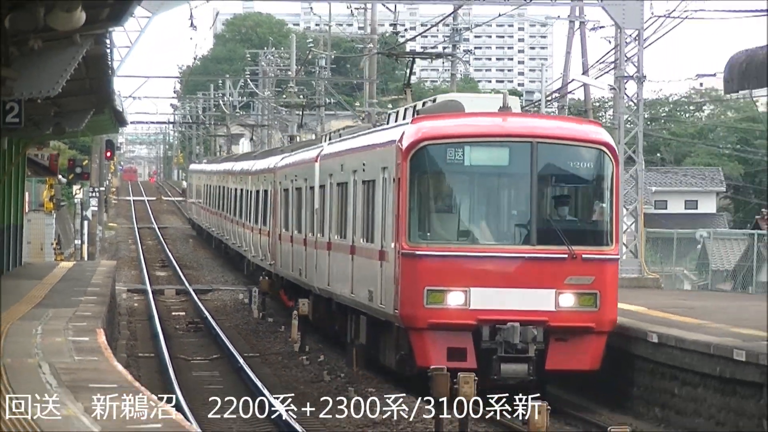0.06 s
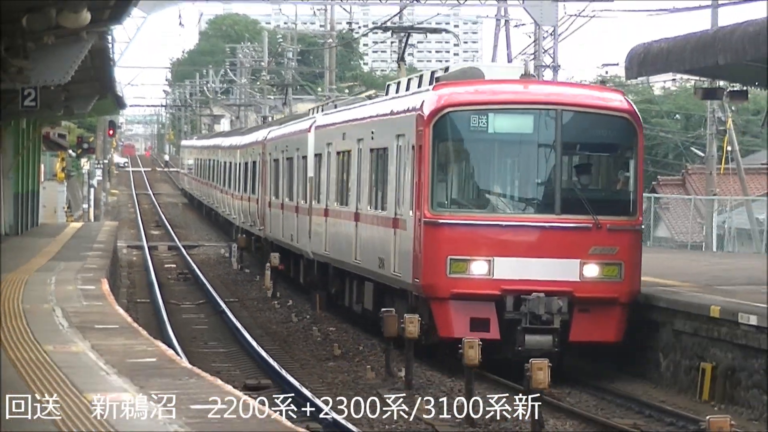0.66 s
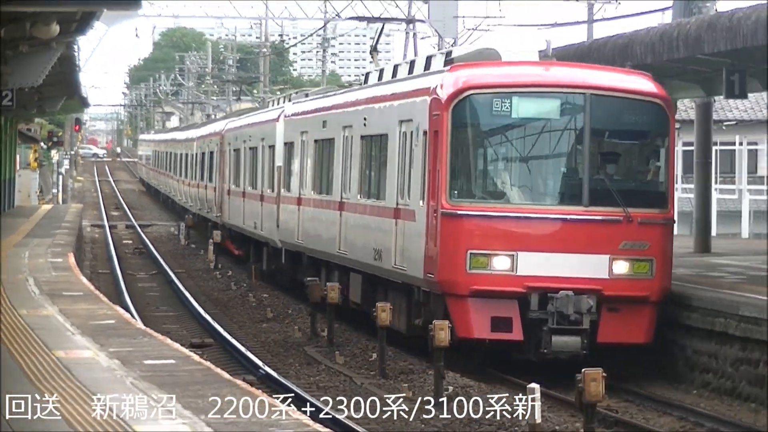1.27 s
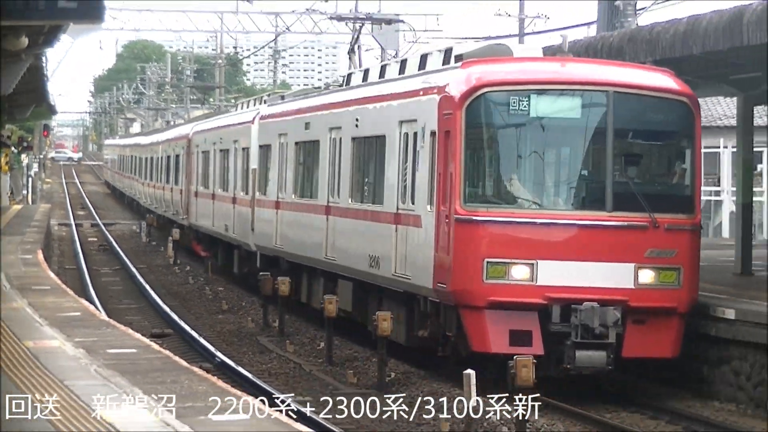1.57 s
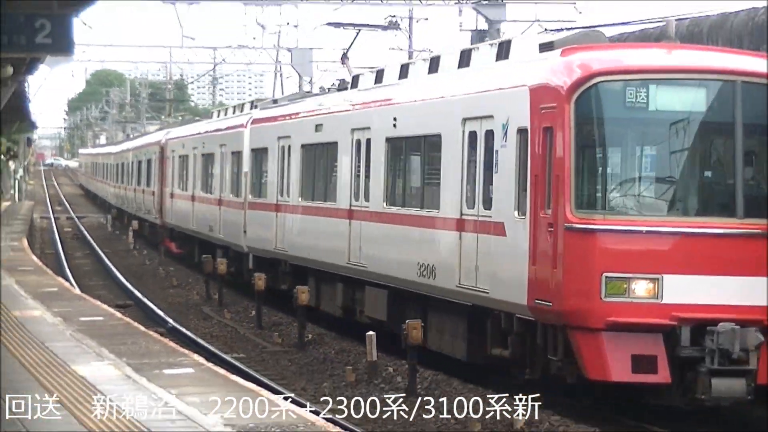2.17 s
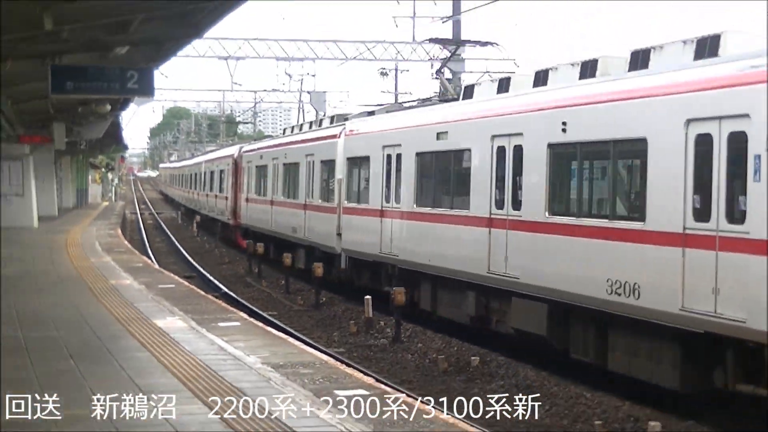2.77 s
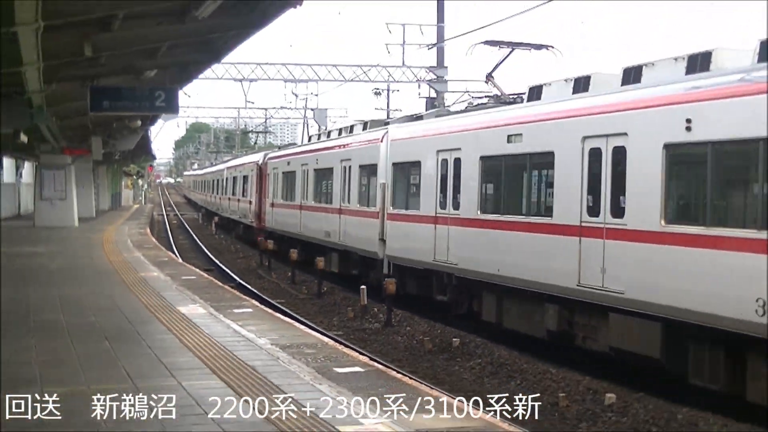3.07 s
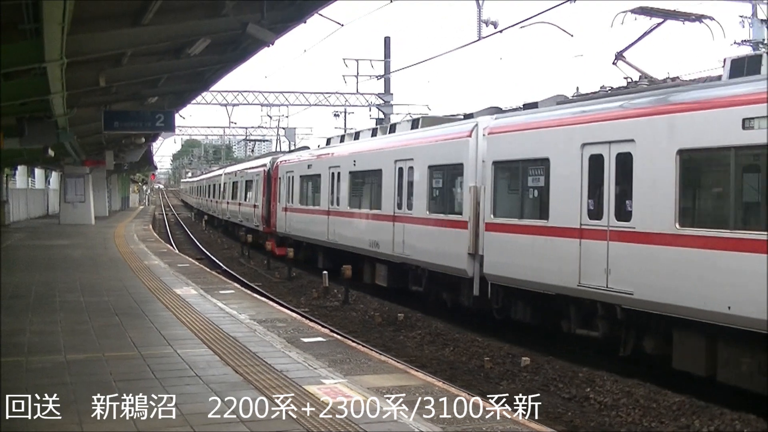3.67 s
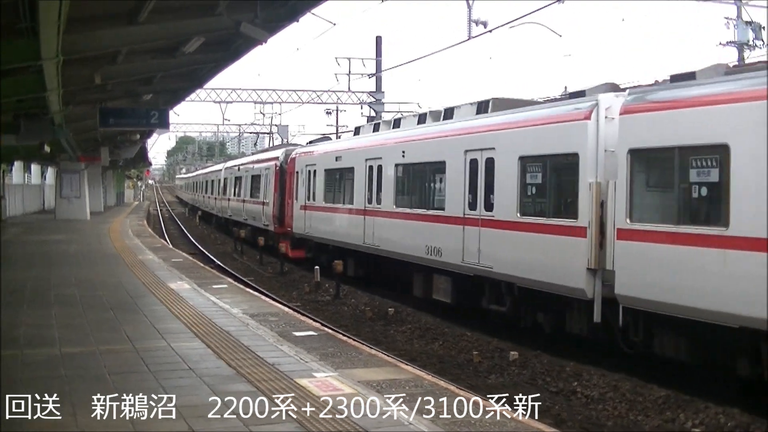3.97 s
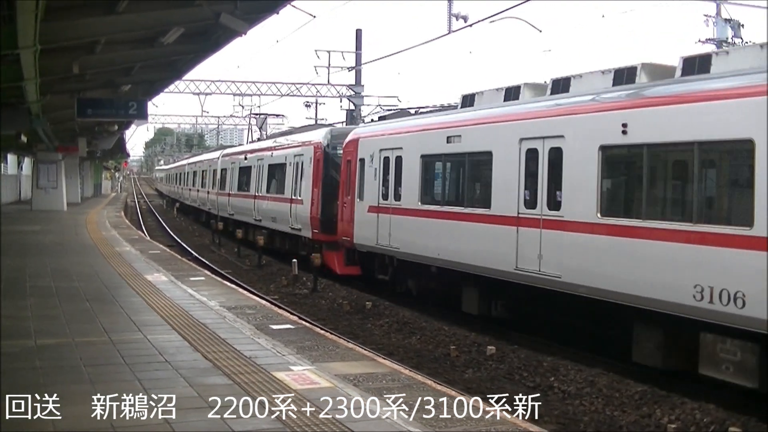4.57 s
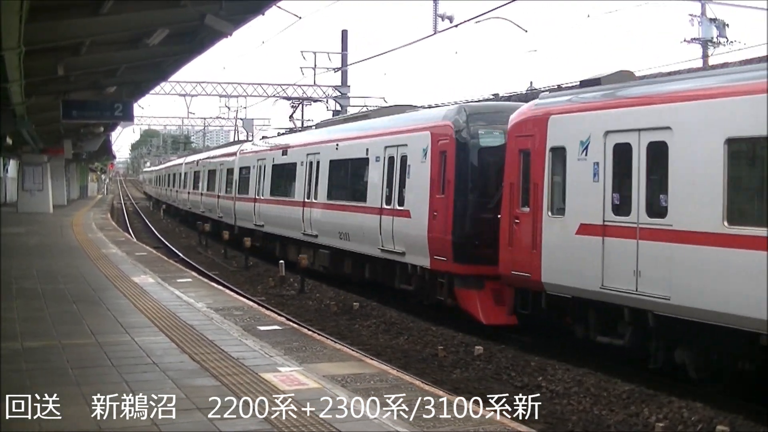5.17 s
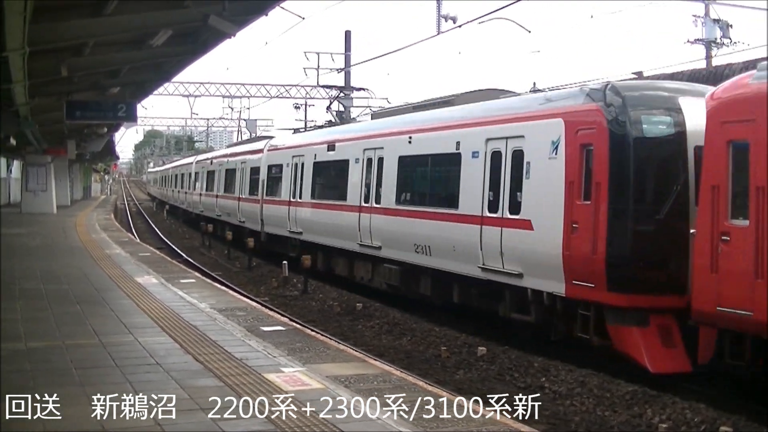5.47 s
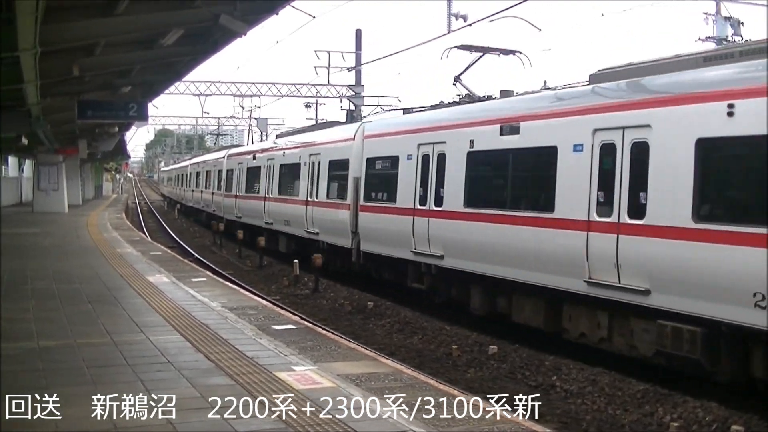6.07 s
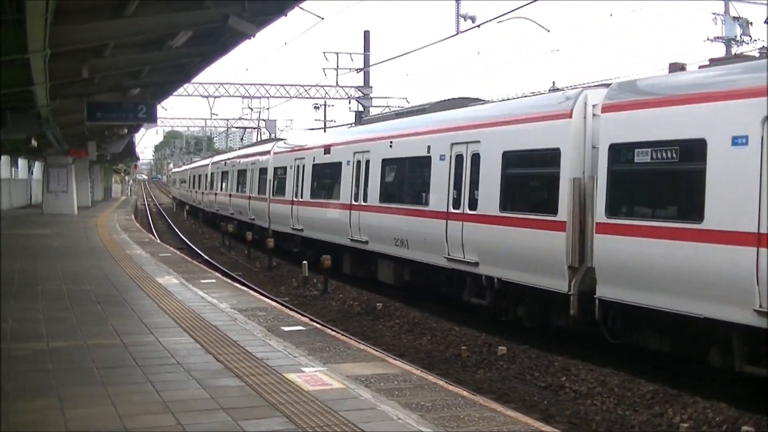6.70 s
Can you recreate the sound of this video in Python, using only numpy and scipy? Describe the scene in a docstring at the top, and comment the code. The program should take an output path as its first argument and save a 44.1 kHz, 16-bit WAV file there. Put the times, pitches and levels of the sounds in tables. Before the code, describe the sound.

Piercing wheel squeals and flange grinding ride over the rumble and paired rail-joint thuds of an electric train passing a platform.

```python
"""Wheels rumble and thud over rail joints as an electric train rolls through a curved station,
about six metres from a stereo microphone on the platform. In the curve the flanges scrape and set
the wheel discs ringing. Then one wheel after another squeals, its pitch sinking as it passes,
and the platform roof smears the squeal."""
import sys
import numpy as np
from scipy import signal
from scipy.fft import rfft, irfft, next_fast_len
from scipy.io import wavfile
from scipy.ndimage import uniform_filter1d

SR = 44100
rng = np.random.default_rng(int(sys.argv[2]) if len(sys.argv) > 2 else 0)


def pcm_store(signal):
    """Save signal as 16-bit PCM."""
    levels = np.round(np.clip(np.atleast_2d(signal), -1, 1) * 32767)
    wavfile.write(sys.argv[1], SR, levels.astype(np.int16).T)


N = 306054
TIME = np.arange(N) / SR


def from_db(db):
    """Decibels to gain."""
    return 10 ** (np.asarray(db) / 20)


def unit(x):
    """Scales to rms 1."""
    return x / np.sqrt(np.mean(x ** 2) + 1e-20)


def follow(rows, column=1):
    """One column of a timed table at every sample."""
    rows = np.asarray(rows)
    return np.interp(TIME, rows[:, 0], rows[:, column])


def colour(points, hz):
    """Reads a spectrum on a log-frequency axis."""
    f, value = np.transpose(points)
    return np.interp(np.log(hz + 1), np.log(f), value)


def drift(rate_hz):
    """A random wander of rms 1, up to about rate_hz."""
    size = next_fast_len(N)
    hz = np.fft.rfftfreq(size, 1 / SR)
    return unit(irfft(rfft(rng.standard_normal(size)) * np.exp(-(hz / rate_hz) ** 2), size)[:N])


def gate(start, end, fade_s):
    """Opens at start and closes at end with soft edges."""
    return np.sin(np.pi / 2 * np.clip(np.minimum(TIME - start, end - TIME) / fade_s, 0, 1))


# likeness of the microphone's left and right channels: f/Hz, coherence
MIC_COHERENCE = [(25, 0.92), (60, 0.97), (130, 1), (300, 1), (700, 0.99), (1400, 0.99), (3000, 0.88),
                 (5000, 0.67), (6500, 0.49), (8500, 0.065), (15000, -0.13)]
def noise(spectrum, band_hz=None, modes=(), patchy_db=0):
    """Stereo noise with resonances and shifting patches; its mid signal has rms 1 within the band."""
    hz = np.fft.rfftfreq(2048, 1 / SR)
    a, b, c, d, patches = rng.standard_normal((5, N // 512 + 5, len(hz)))
    patches = unit(uniform_filter1d(uniform_filter1d(patches, size=6, axis=0), size=16, axis=1))
    ring = 1 + sum(from_db(db) ** 2 / (1 + (2 * (hz - f) / width) ** 2) for f, width, db in modes)
    gain = from_db(colour(spectrum, hz) + patchy_db * patches) * np.sqrt(ring)
    coherence = np.clip(colour(MIC_COHERENCE, hz), -.9, .999)
    spread = np.sqrt((1 - coherence) / (1 + coherence))
    frames = gain * np.array([a + 1j * b, (c + 1j * d) * spread])
    mid, side = signal.istft(frames.swapaxes(1, 2), nperseg=2048, noverlap=1536)[1][:, :N]
    in_band = mid
    if band_hz:
        in_band = signal.sosfilt(signal.butter(4, band_hz, "bandpass", fs=SR, output="sos"), mid)
    return np.array([mid + side, mid - side]) / in_band.std()


def whistle(hz, width_hz, spread):
    """A tone shaken at random: a fuzzy line that follows hz, with a side part of size spread."""
    size = next_fast_len(N)
    offset_hz = np.fft.fftfreq(size, 1 / SR)
    a, b = rng.standard_normal((2, 2, size))
    flutter = np.fft.ifft((a + 1j * b) / (1 + (offset_hz / width_hz) ** 2))[:, :N]
    mid, side = unit((flutter * np.exp(2j * np.pi * np.cumsum(hz) / SR)).real)
    return np.array([mid + spread * side, mid - spread * side])


def passing(abreast, train_m_s=12.5, mic_distance_m=6.4, sound_m_s=343):
    """A wheel from the platform: relative Doppler shift, nearness (1 abreast), bearing (-1 coming)."""
    along = train_m_s * (TIME - abreast)
    distance = np.hypot(along, mic_distance_m)
    bearing = along / distance
    shift = 1 / (1 + train_m_s * bearing / sound_m_s) - 1
    return shift, mic_distance_m / distance, bearing


# rolling as it reaches the platform: t/s, rumble level/dB, roar level/dB
ROLLING_LEVELS = [(0.0, -33, -45), (0.69, -31, -42.5), (0.99, -24.5, -39), (1.45, -29, -39.5),
                  (1.8, -26.5, -32.5), (1.91, -21.5, -29), (2.34, -33, -39), (2.74, -29, -40),
                  (2.88, -33.5, -36.5), (3.52, -36, -44.5), (3.86, -33, -39.5), (4.42, -38, -46),
                  (4.6, -35.5, -42), (5.68, -24, -35.5), (5.87, -26, -37.5), (6.05, -31.5, -44),
                  (6.34, -30.5, -42.5), (6.94, -25.5, -36)]
# bogie and track resonances: f/Hz, width/Hz, level/dB over the broad rumble
BOGIE_RESONANCES = [(154, 92, -2), (365, 56, 3), (733, 56, -1.5)]
# spectra of track rumble and rail roar: f/Hz, level/dB
RUMBLE_SPECTRUM = [(20, -48), (45, -21), (70, -12.5), (120, -9), (200, -5.5), (280, -1), (370, -2.5),
                   (470, -2), (600, -4.5), (800, -3.5), (1000, -10), (1400, -21), (3000, -52)]
ROAR_SPECTRUM = [(300, -19), (1000, 2), (1500, 1.5), (2300, 6), (3300, 1.5), (5000, -1), (6800, -6.5),
                 (8500, -16.5), (11000, -25), (15500, -40)]
def rolling():
    """Rough treads shake the track and bogies (rumble) and make the rails roar."""
    bumps_db = drift(18)
    rumble = noise(RUMBLE_SPECTRUM, (60, 1100), BOGIE_RESONANCES, patchy_db=2.5)
    rumble *= from_db(follow(ROLLING_LEVELS) + bumps_db - 0.23)
    roar = noise(ROAR_SPECTRUM, (1200, 1900), patchy_db=2)
    roar *= from_db(follow(ROLLING_LEVELS, column=2) + 0.56 * bumps_db - 1)
    return rumble + roar


# bogies crossing a joint: t/s, leading thud level/dB, trailing thud level/dB, clank level/dB re thud
JOINT_CROSSINGS = [(0.002, -36, -26.5, -15), (0.835, -18.5, -21.5, -10), (1.764, -22, -20.5, -18),
                   (2.614, -21.5, -26.5, -6.5), (3.528, -32.5, -30, -10), (3.869, -32.5, -35, -10),
                   (4.44, -29, -23.5, -22), (4.904, -26.5, -24.5, -10), (5.353, -19.5, -17, -17),
                   (5.82, -17.5, -19.5, -15.5), (6.285, -30, -21, -13), (6.733, -17, -17.5, -23)]
# spectra of the bogie's thud and the steel's clank: f/Hz, level/dB
THUD_SPECTRUM = [(20, -44), (55, -27), (110, -10), (200, -5), (290, 1.5), (380, 0.5), (500, 0), (720, -5),
                 (1000, -13.5), (1500, -22), (3000, -58)]
CLANK_SPECTRUM = [(400, -3), (1000, 5), (1500, -3), (2500, -2), (4500, -7.5), (7000, -19), (10000, -40),
                  (15000, -52)]
def rail_joints(axle_gap_s=.152, hold_s=.038, rise_s=.004, contact_s=.002, roof_db=-11, crack_db=-2):
    """Two axles drop on a joint in turn: steel cracks and clanks, the bogie shudders, the roof echoes."""
    thud_t60, roof_t60, clank_t60, crack_t60 = .27, .7, .47, .042  # seconds to fall 60 dB
    thud_power, clank_power = np.zeros((2, N))
    for start, leading_db, trailing_db, clank_db in JOINT_CROSSINGS:
        for hit, db in (start, leading_db), (start + axle_gap_s, trailing_db):
            age = np.maximum(TIME - hit + contact_s, 0)
            shudder = from_db(-60 * np.maximum(age - hold_s, 0) / thud_t60)
            roof = from_db(roof_db - 60 * age / roof_t60)
            thud_power += (from_db(db) * (1 - np.exp(-age / rise_s))) ** 2 * (shudder ** 2 + roof ** 2)
            steel = from_db(-60 * age / clank_t60) + from_db(crack_db - 60 * age / crack_t60)
            clank_power += (from_db(db + clank_db) * steel * (1 - np.exp(-age / contact_s))) ** 2
    thuds = noise(THUD_SPECTRUM, (100, 1100), BOGIE_RESONANCES, patchy_db=1.5) * np.sqrt(thud_power)
    clanks = noise(CLANK_SPECTRUM, (1000, 1900)) * np.sqrt(clank_power)
    return from_db(-1.87) * thuds + from_db(-0.5) * clanks


# flanges rubbing in the curve by the platform: t/s, scrape level/dB, fizz level/dB
FLANGE_LEVELS = [(1.5, -38, -64), (1.6, -24, -63), (1.98, -22.5, -45), (2.07, -16.5, -30),
                 (2.32, -23, -34.5), (2.83, -23, -33), (3.44, -25, -33), (3.95, -23, -33.5),
                 (4.36, -31.5, -40.5), (4.59, -22, -34.5), (4.74, -30.5, -37.5), (5.64, -24, -39.5),
                 (5.83, -32, -41.5), (5.95, -22.5, -35), (6.89, -23.5, -38), (6.94, -26, -48)]
# a flange pressed harder for a moment: peak t/s, level/dB added to the scrape
FLANGE_SWELLS = [(2.56, 2.5), (3.26, 3), (3.79, 1.5), (4.19, 3), (5.08, 0.5), (5.47, 3), (6.4, 3)]
# a flange biting hard into the rail: start t/s, end t/s, level/dB
FLANGE_BITES = [(5.897, 6.115, -23), (6.452, 6.891, -22.5)]
# wheel disc modes rung by scraping and by biting: f/Hz, width/Hz, level/dB over the broad noise
SCRAPE_MODES = [(2220, 233, 10.5), (4200, 250, 6.5), (5310, 360, 6.5), (6530, 330, 5), (7560, 190, 5.5),
                (8540, 200, 9.5)]
RASP_MODES = [(8530, 210, 12)]
# spectra of flange on rail: f/Hz, level/dB
SCRAPE_SPECTRUM = [(900, -12), (1700, -11.5), (2400, -5), (3100, 3.5), (3700, -0.5), (4800, 2),
                   (5800, -1.5), (7000, -10.5), (8000, -11.5), (10000, -20), (15500, -31)]
FIZZ_SPECTRUM = [(3000, -51), (6000, -12), (7400, 10.5), (8000, 0), (8500, 8), (9100, 2), (10000, 2),
                 (12500, 1.5), (14000, -1.5), (15500, -10.5)]
RASP_SPECTRUM = [(2000, -36), (3500, -18), (6000, 6), (7400, 3), (8000, -2.5), (8600, -3), (9600, -5),
                 (11000, -13), (15000, -30)]
def flanges(start_s=1.543, swell_s=.057):
    """Flanges grind on the rail and ring the wheel discs; dry contact adds a fizz, a hard bite a rasp."""
    grip_db = 0.99 * drift(29)
    swell_db = sum(db * np.exp(-((TIME - peak) / swell_s) ** 2) for peak, db in FLANGE_SWELLS)
    scrape = noise(SCRAPE_SPECTRUM, (2500, 5600), SCRAPE_MODES, patchy_db=2)
    scrape *= from_db(follow(FLANGE_LEVELS) + swell_db + grip_db - 1.62)
    fizz = noise(FIZZ_SPECTRUM, (10500, 15000), patchy_db=3)
    fizz *= from_db(follow(FLANGE_LEVELS, column=2) + 0.89 * swell_db + 1.1 * grip_db - 2.5)
    pressure = sum(from_db(db) * gate(start, end, fade_s=.02) for start, end, db in FLANGE_BITES)
    rasp = noise(RASP_SPECTRUM, modes=RASP_MODES, patchy_db=3) * pressure * from_db(1.7 * drift(40))
    return (scrape + fizz) * gate(start_s, np.inf, fade_s=.09) + rasp


# tones behind the squeal: start t/s, end t/s, abreast of the microphone t/s, f/Hz, level/dB
FAINT_TONES = [(1.5, 2.5, 2.58, 2194, -36), (1.75, 3.098, 2.5, 4123, -30), (2.004, 2.16, 2.7, 5240, -27),
               (2.1, 2.75, 2.5, 1036, -39), (2.3, 2.9, 4.1, 10550, -41), (2.8, 3.22, 2.9, 11900, -37.5),
               (2.95, 4.3, 3.69, 2235, -37.5), (3.15, 3.7, 3.6, 10530, -38), (3.6, 4.548, 4.2, 10600, -39),
               (3.6, 4.08, 3.69, 5220, -30.5), (3.85, 5.45, 5, 12640, -40.5)]
def faint_tones(flutter_db=1.8, doppler_share=.75):
    """Ringing wheel modes and a traction motor whine near 1 kHz swell, flutter and sink as they pass."""
    out = np.zeros((2, N))
    for start, end, abreast, hz, db in FAINT_TONES:
        shift = passing(abreast)[0]
        coherence = np.clip(colour(MIC_COHERENCE, hz), 0, 1)
        spread = np.sqrt((1 - coherence) / (1 + coherence))
        line = whistle(hz * (1 + doppler_share * shift), width_hz=25 + .016 * hz, spread=spread)
        swell = gate(start, end, fade_s=.33 * (end - start))
        out += from_db(db + flutter_db * drift(14)) * swell * line
    return out


# squeals: start t/s, slip end t/s, abreast of the microphone t/s, direct level/dB, echo level/dB
WHEEL_SQUEALS = [(2.042, 3.815, 3.69, -19, -17.5), (2.293, 2.47, 2.58, -23, -23),
                 (3.83, 4.81, 4.6, -16.5, -17), (4.8, 5.03, 4.6, -21.5, -18), (5.086, 5.33, 4.6, -20, -18),
                 (5.316, 5.88, 4.47, -17.5, -28.5), (5.63, 5.77, 4.5, -20, -20.5),
                 (5.854, 5.944, 5.6, -25, -20), (6.038, 6.37, 6.28, -24.5, -18),
                 (6.538, 6.613, 6.28, -27, -22), (6.77, 6.86, 6.28, -26, -21)]
def squeals(mode_hz=6345, rise_s=.074, ring_t60=.57, pan_db=1.5):
    """Stick-slip locks each wheel on one mode; Doppler bends it and the platform roof smears it."""
    out = np.zeros((2, N))
    waver_hz = 10 * drift(40)
    lag_rad = 0.27 + .5 * drift(10)  # between the microphone's channels
    flutter = from_db(2.7 * drift(26))
    for start, end, abreast, direct_db, echo_db in WHEEL_SQUEALS:
        shift, nearness, bearing = passing(abreast)
        phase = 2 * np.pi * np.cumsum(mode_hz * (1 + shift) + waver_hz) / SR
        tone = unit(np.sin([phase + lag_rad / 2, phase - lag_rad / 2]) * flutter)
        direct = from_db(direct_db) * nearness * tone
        # echoes come from all sides, so they bend less and fall off less with distance
        smear = whistle(mode_hz * (1 + .6 * shift), width_hz=180, spread=.59)
        echoes = from_db(echo_db) * nearness ** .15 * smear
        ring_out = from_db(-60 * np.maximum(TIME - end, 0) / ring_t60)
        pan = from_db(np.outer([-.5, .5], pan_db * bearing))  # left to right
        out += gate(start, np.inf, rise_s) * ring_out * pan * (direct + echoes)
    return out


def scene():
    """The whole train as heard from the platform."""
    return rolling() + rail_joints() + flanges() + squeals() + faint_tones()


def record(dry):
    """The microphone chain rounds off the highest peaks and cuts the top of the treble."""
    ceiling, edge_hz = .9, 15700
    rounded = dry / (1 + (dry / ceiling) ** 8) ** (1 / 8)
    lowpass = signal.firwin(511, edge_hz, window=("kaiser", 9), fs=SR)
    return signal.oaconvolve(rounded, lowpass[None], "same", axes=1)


dry = scene()
out = record(dry)
pcm_store(out)
```